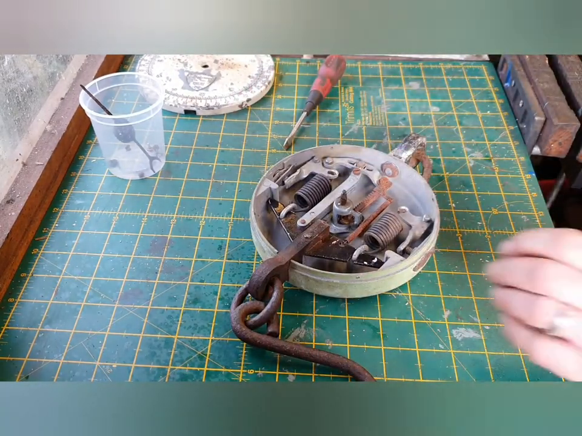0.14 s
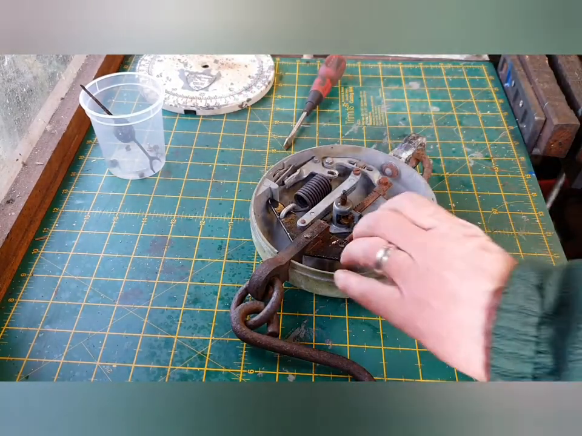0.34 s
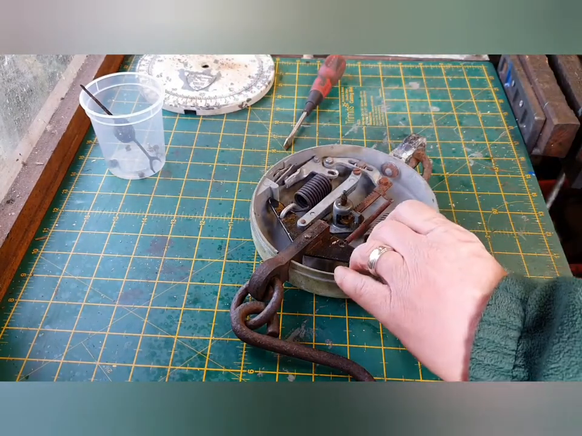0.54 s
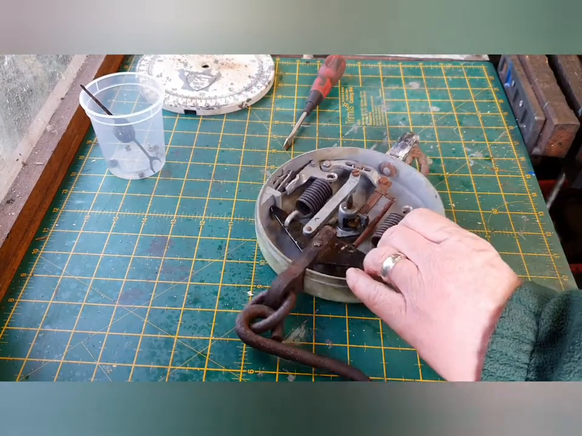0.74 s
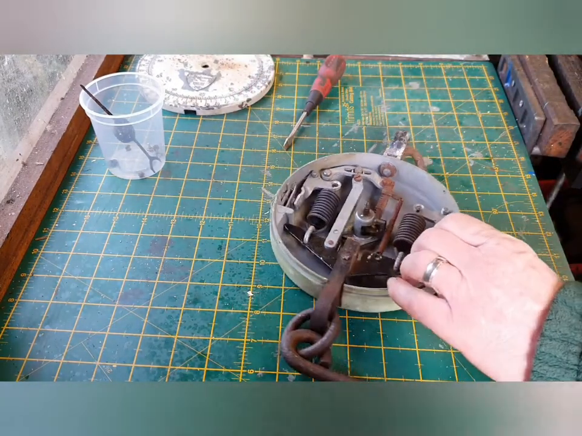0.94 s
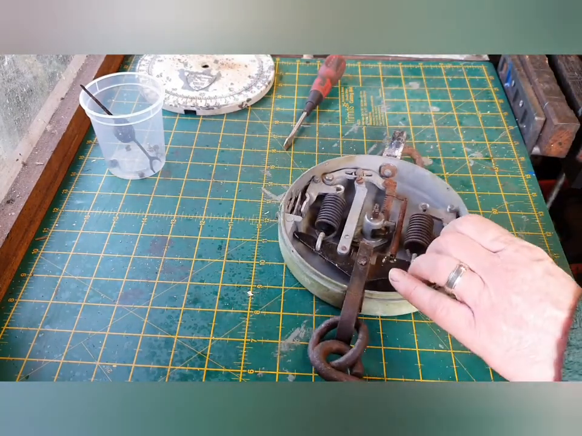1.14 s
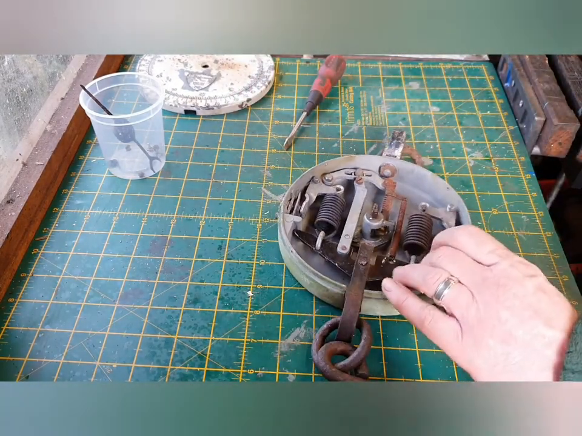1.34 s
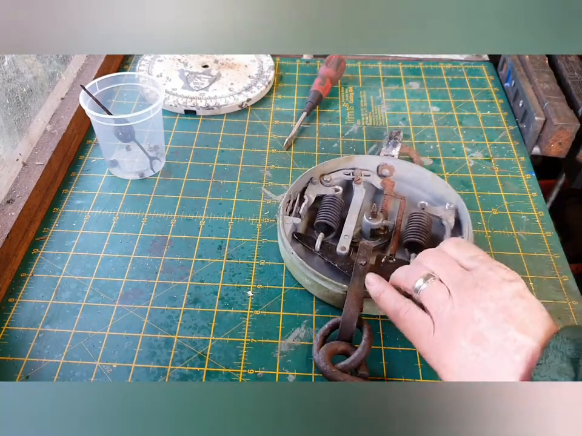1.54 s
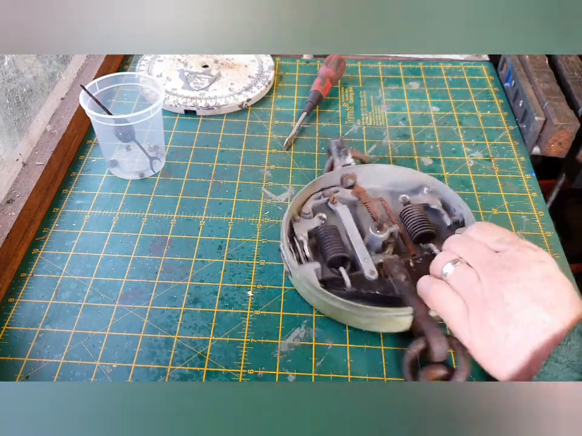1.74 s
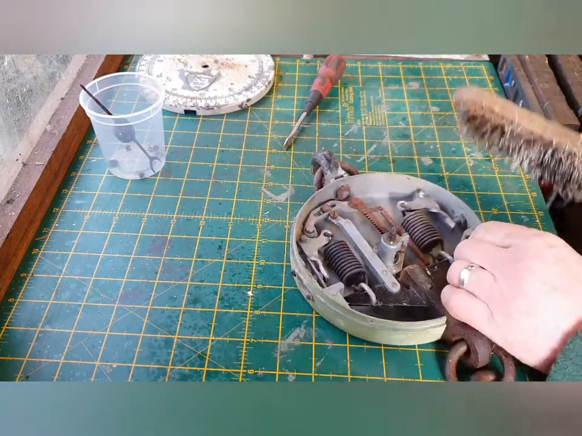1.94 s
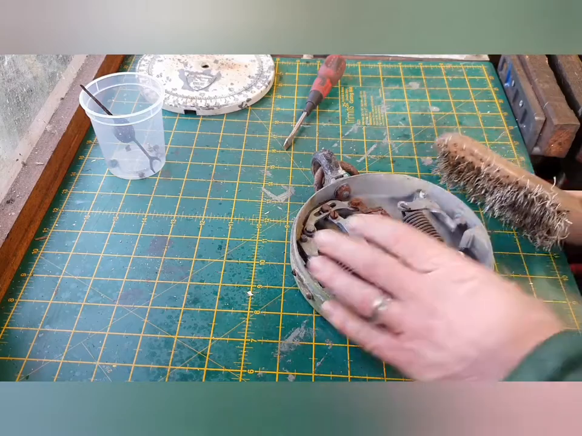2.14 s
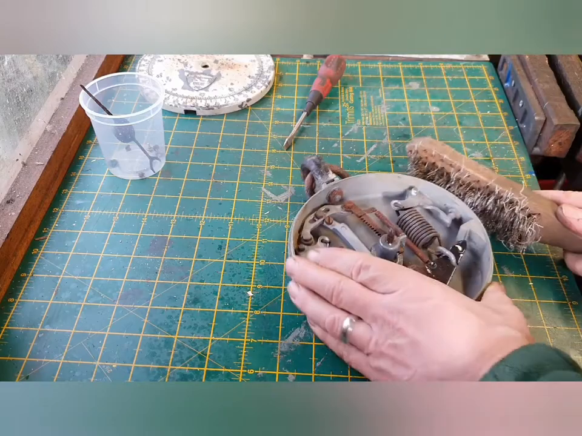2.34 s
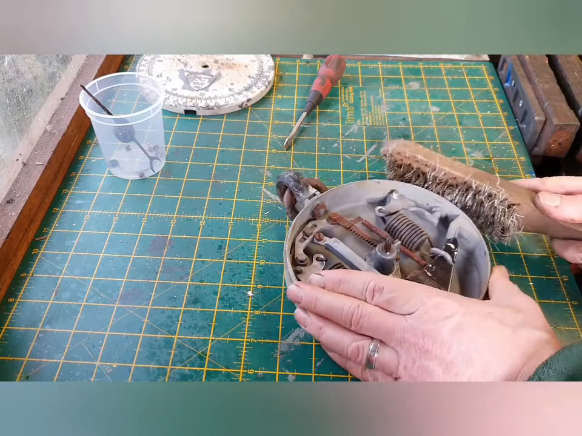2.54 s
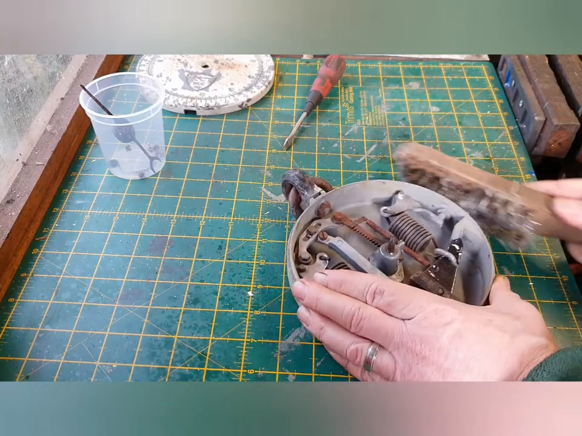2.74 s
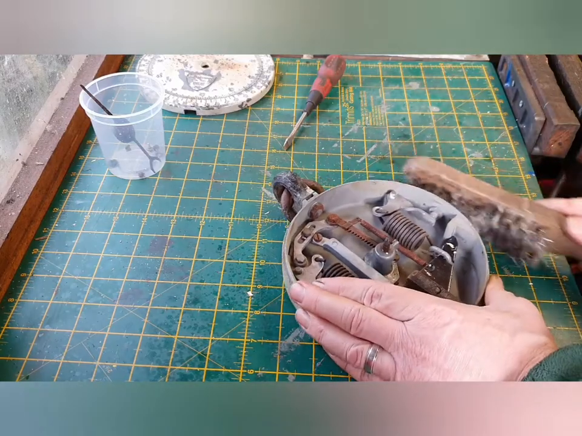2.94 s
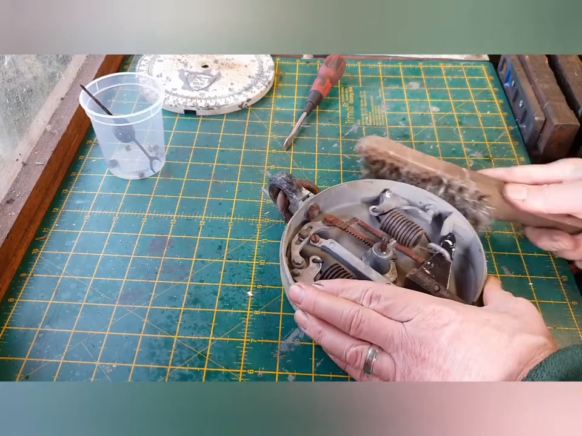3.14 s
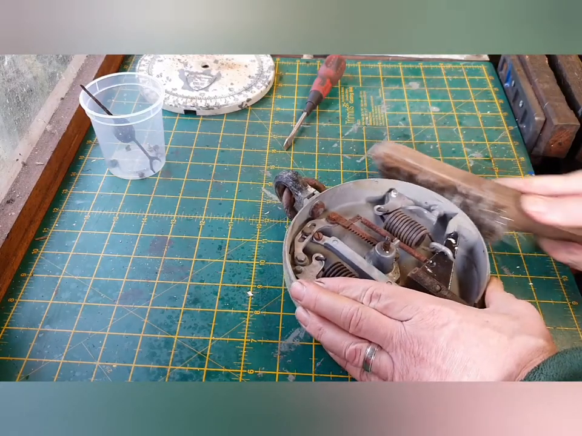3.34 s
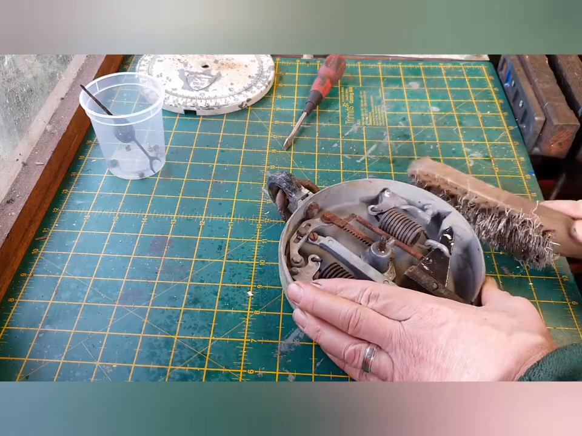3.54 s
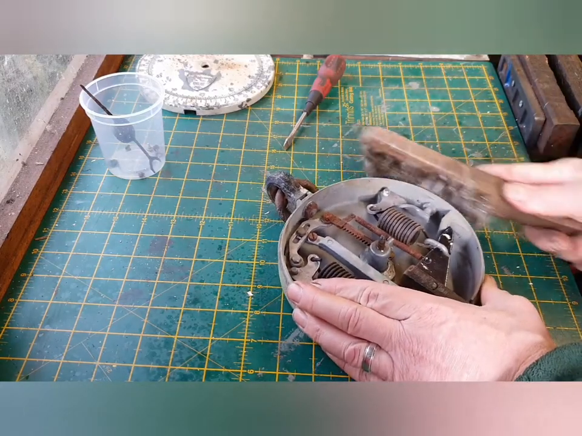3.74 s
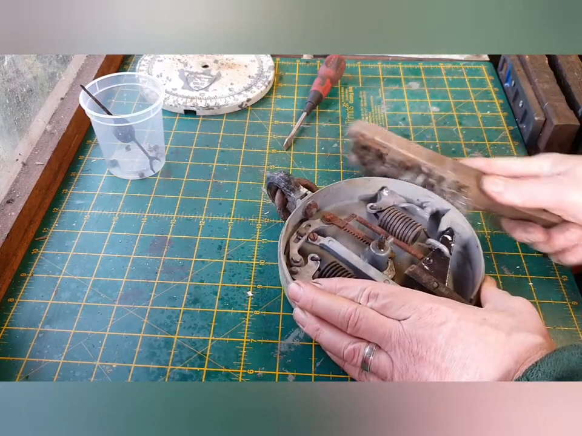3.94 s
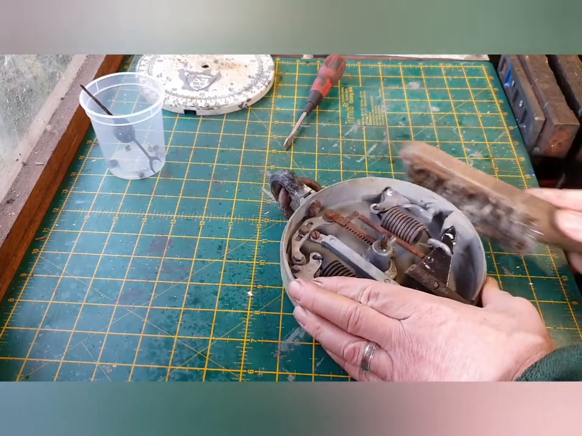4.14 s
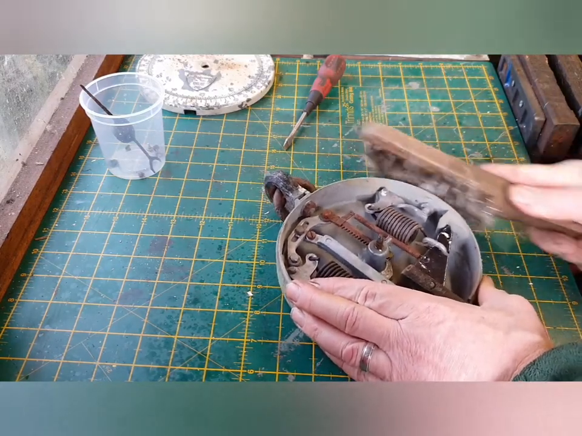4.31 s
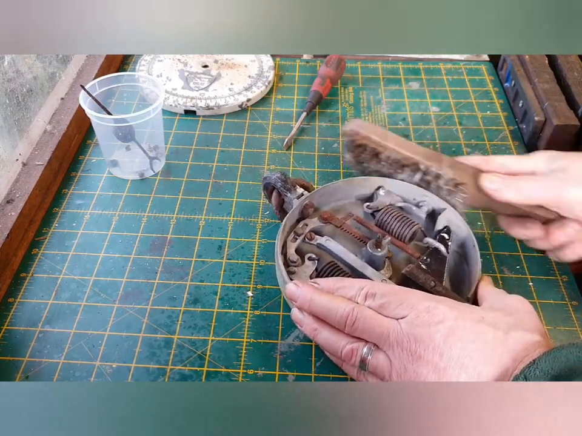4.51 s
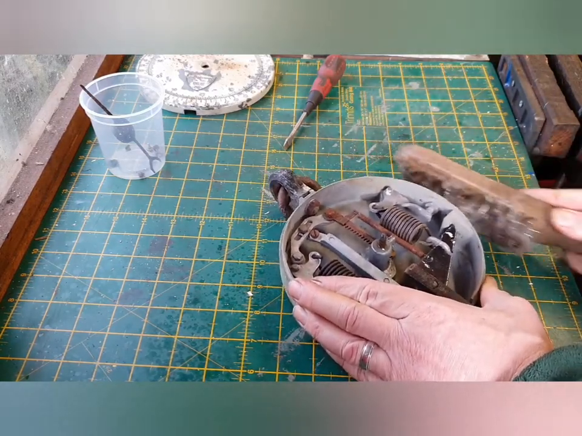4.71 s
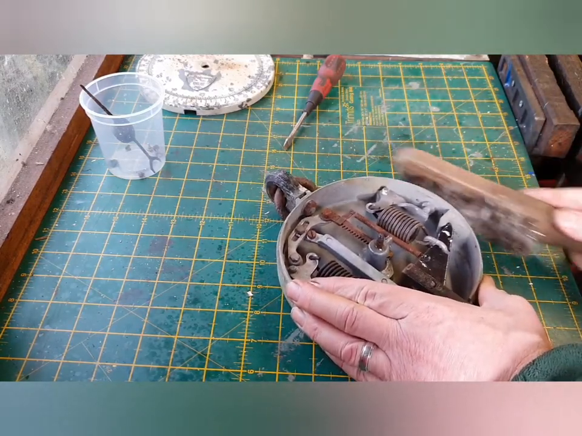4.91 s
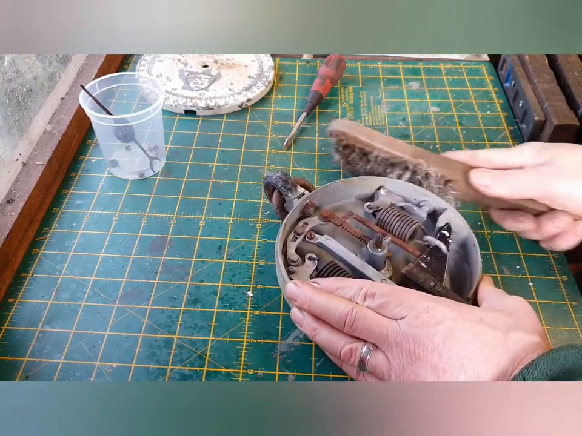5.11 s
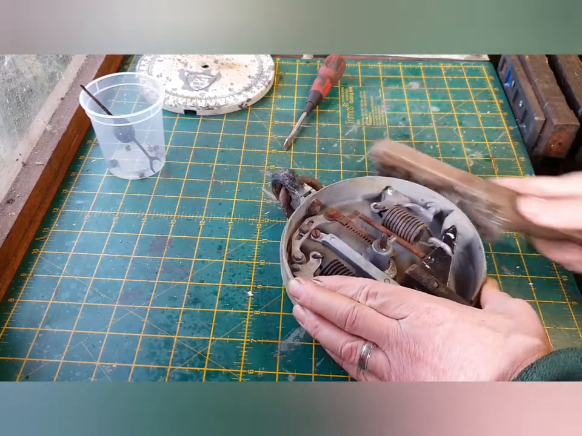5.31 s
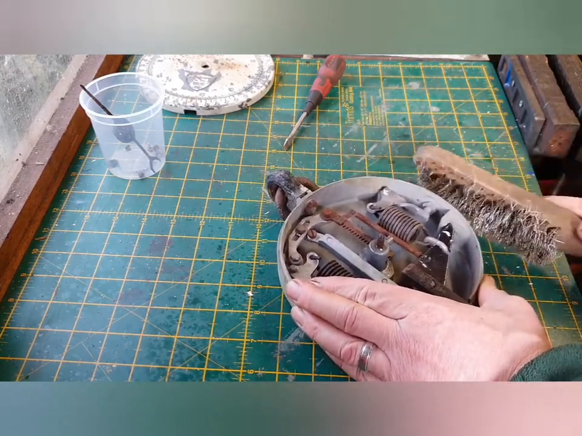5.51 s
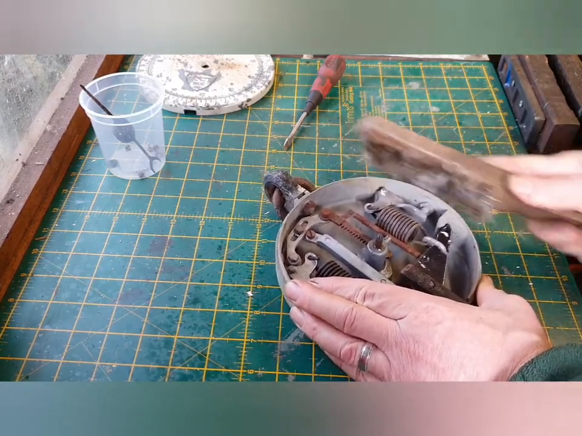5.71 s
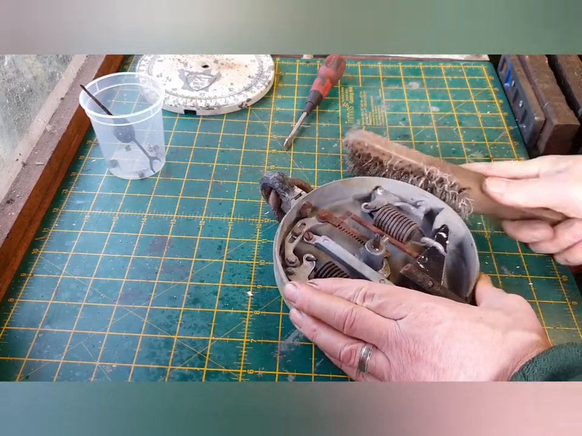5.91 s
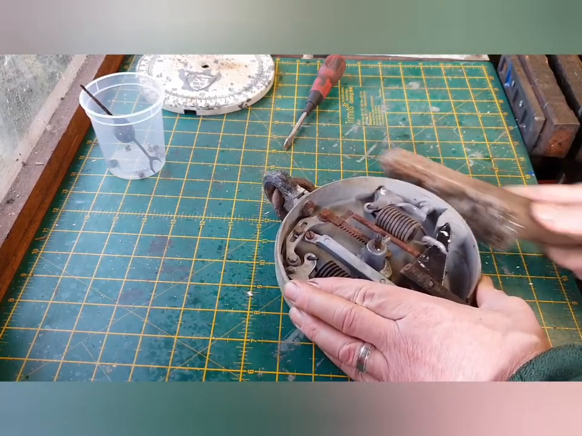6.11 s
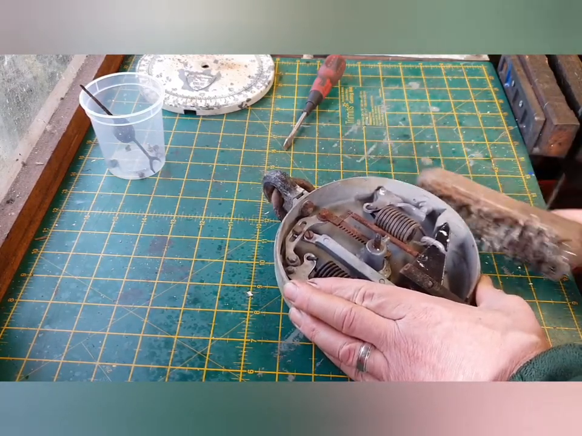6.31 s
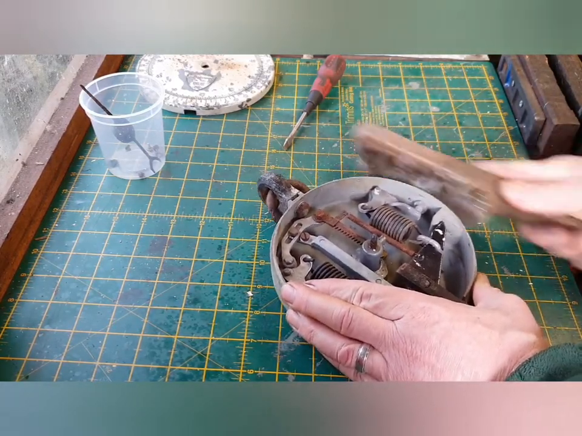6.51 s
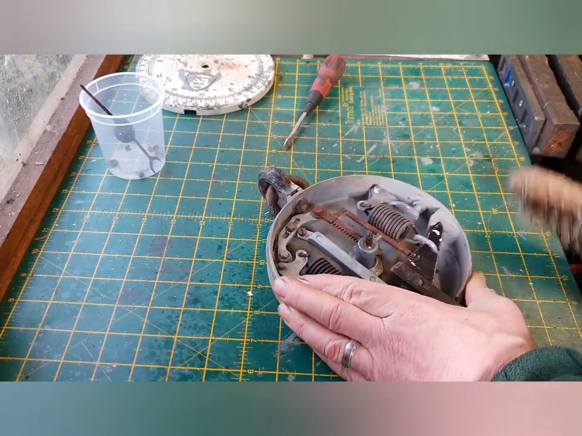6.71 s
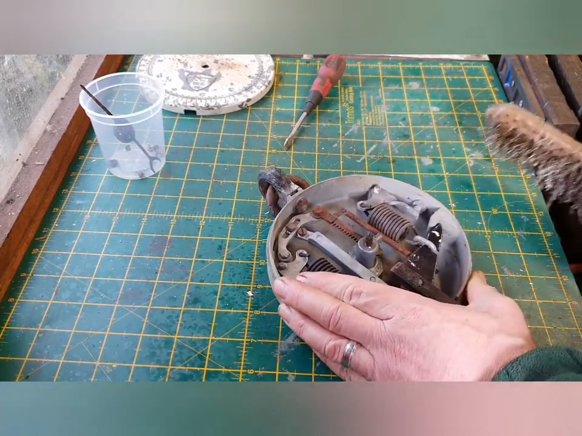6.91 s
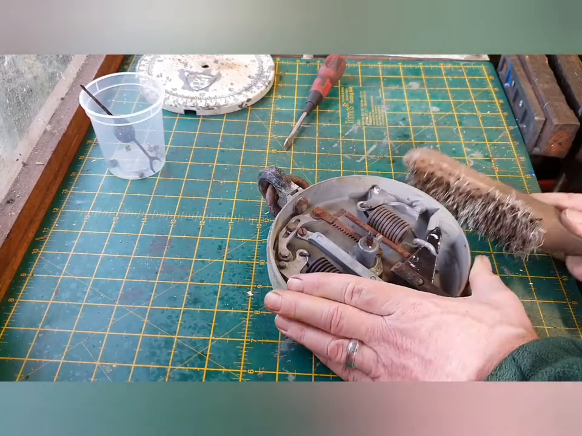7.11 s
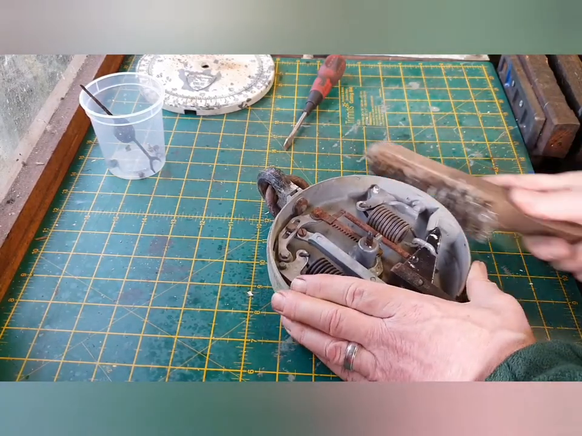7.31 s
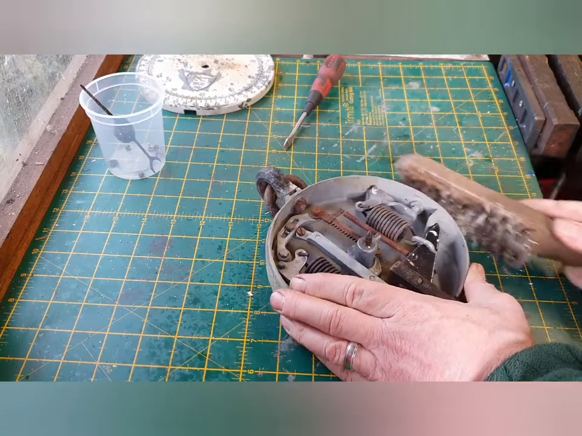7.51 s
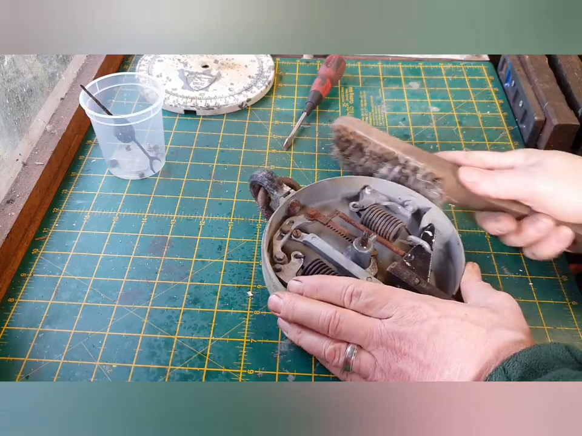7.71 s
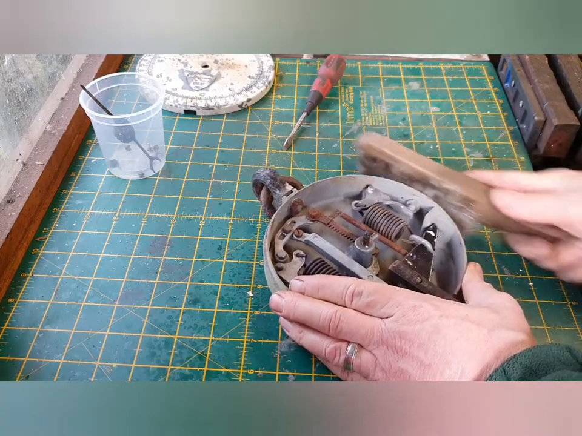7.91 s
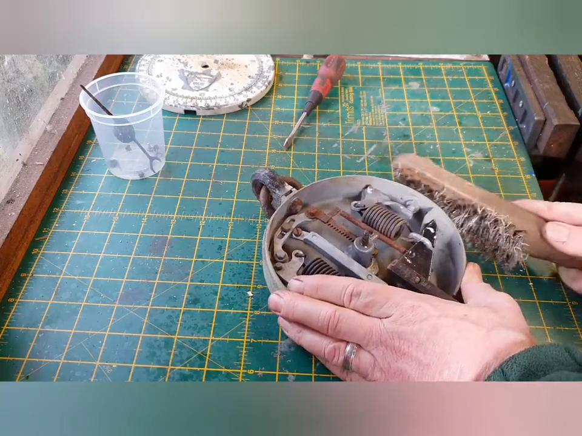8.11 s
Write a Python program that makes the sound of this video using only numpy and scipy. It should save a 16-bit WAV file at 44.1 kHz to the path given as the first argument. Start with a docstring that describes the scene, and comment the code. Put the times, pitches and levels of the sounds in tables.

```python
"""Wire brush on a rusty steel case

At a workbench in a quiet workshop, a close pair of microphones hears a round steel case turned on a rubber mat:
struck modes make its iron hook clank, and coloured clicks drag it over specks of rust.
Then a wire brush scrubs the rim, seven strokes a second, with one short pause: a dense rain of clicks hisses
and rings the steel's resonances, wires snag, the wooden back bumps in bursts of noise, and the bench drums.
Close walls add a short diffuse tail; room tone and a rustling sleeve lie behind."""
import sys
import numpy as np
from scipy import signal
from scipy.fft import rfft, irfft, next_fast_len
from scipy.io import wavfile
from scipy.ndimage import uniform_filter1d, map_coordinates

SR = 44100
rng = np.random.default_rng(int(sys.argv[2]) if len(sys.argv) > 2 else 0)


def wav_record(signal):
    """Record a signal, one row per channel, as 16-bit PCM in the file named by sys.argv[1]."""
    frames = np.transpose(np.atleast_2d(signal))
    bounded = np.clip(frames, -1, 1)
    # unit amplitude maps onto the largest positive 16-bit level
    quanta = np.round(bounded * 32767).astype(np.int16)
    wavfile.write(sys.argv[1], SR, quanta)


N = 359415
TIME, BINS = np.arange(N) / SR, np.fft.rfftfreq(N, 1 / SR)  # [s], [Hz]

# Levels in the tables are relative: each source trims them again.
# the quiet workshop: (frequency [Hz], level [dB])
ROOM_TONE = [(15, -41.5), (28, -20.5), (55, -2), (92, -4), (256, -21.5), (463, -27.5), (750, -34.5),
             (1130, -44), (4490, -52), (8590, -46.5), (16000, -64)]
# rustle of the sleeve: (frequency [Hz], level [dB])
SLEEVE = [(20, -15), (70, 7.5), (200, 1), (500, -11), (950, -10.5), (2000, -27), (3300, -30.5),
          (5000, -36.5), (9000, -32), (16000, -42)]
# how briskly the arm moves until it comes to rest on the case: (time [s], level [dB])
REACHING = [(0, -2), (.35, 2), (1.15, 2), (1.35, -9), (1.95, -4.5), (2.15, -13), (2.5, 0), (2.8, -47)]
# decay of the room: (frequency [Hz], time to fall 60 dB [s])
ROOM = [(100, 0.46), (500, 0.15), (1500, 0.14), (4000, 0.13), (9000, 0.077), (16000, 0.063)]
# correlation of the two microphones: (frequency [Hz], likeness [-1 to 1])
ALIKE = [(100, 1), (400, 0.88), (800, 0.41), (1400, 0.33), (1900, -0.16), (4000, 0.25), (5000, 0.16),
         (7000, 0.0093), (16000, -0.092)]
# balance of the pair: (frequency [Hz], left minus right [dB])
LEAN = [(300, 2.1), (700, -.4), (1200, .2), (2500, -1), (9000, -.9), (13000, .7)]
# the bench as a drum: (frequency [Hz], level [dB])
BENCH = [(15, -32), (30, -14), (45, -.8), (62, -2.5), (80, 1.3), (115, 0), (150, -10), (230, -20),
         (400, -32), (900, -60)]
# the case rocking onto the bench: (time [s], level [dB], pitch [Hz])
THUMPS = [(1.75, -25, 197), (1.974, -29.5, 192), (2.341, -26, 94), (2.378, -22, 84), (4.651, -16, 94),
          (4.944, -18.5, 94), (5.093, -16.5, 92), (5.538, -16, 86), (6.158, -19.5, 85), (6.338, -16.5, 89),
          (6.553, -16, 95.4), (7.512, -18, 76), (7.829, -17, 89), (8.128, -19, 86.1)]
# the hand shoves the case over the mat:
# (start [s], length [s], rubber drag [dB], grit [dB], bench shake [dB])
DRAG = [(0.224, 0.045, -51, -56, -51), (.365, 0.064, -48, -51, -47), (0.421, 0.053, -44, -53.5, -35.5),
        (0.49, 0.052, -36, -50, -46), (0.578, .13, -34.5, -43, -39), (0.747, 0.14, -38.5, -51, -37.5),
        (0.814, 0.15, -34.5, -51, -44), (.97, 0.25, -44, -54, -44.5), (1.223, 0.046, -41, -53, -36),
        (1.303, 0.31, -58.5, -60, -48), (1.562, 0.065, -46, -52, -40), (1.641, 0.24, -35, -39.5, -37),
        (1.957, 0.027, -42, -44, -35.5), (2.032, 0.046, -46, -54.5, -47), (2.084, 0.11, -63, -63, -59),
        (2.209, 0.057, -42, -41.5, -37.5), (2.267, 0.079, -39, -43, -31.5), (2.369, .14, -32.5, -41, -35),
        (2.53, 0.33, -44.5, -54.5, -39), (7.193, 0.11, -51.5, -58.5, -37)]
# rubber mat slipping under the case: (frequency [Hz], level [dB])
RUBBER = [(70, -22.5), (140, -23), (200, 3.5), (280, 0.5), (360, -10.5), (440, 1.5), (560, -18.5),
          (900, -15), (2000, -32)]
# specks of rust under the case: (frequency [Hz], level [dB])
GRIT = [(250, -7.5), (600, 5.5), (900, -29.5), (1350, 3.5), (2200, -2), (3300, -3), (4600, -8),
        (8500, -14.5), (16000, -20)]
# rust crushed under the rim in two shoves: (start [s], length [s], level at the end [dB])
GRINDING = [(1.64, .21, -34), (2.37, .06, -41)]
# sound of the crushed rust: (frequency [Hz], level [dB])
GRIND = [(400, -19), (750, -4.5), (1100, -3), (1550, -2.5), (2000, -12), (2400, -10), (2900, -24),
         (5000, -28)]
# hook, case and brush knocking on one another; the last two are brush wires snagging on the rim:
# (time [s], level [dB], treble tick [dB], frequency the struck spot favours [Hz])
KNOCKS_AND_SNAGS = [(.402, -36, -55, 2810), (0.511, -31, -37.8, 2830), (0.582, -36, -50, 2550),
                    (0.6307, -14, -38, 2480), (.639, -25.5, -35, 1490), (.702, -32.5, -37.5, 2840),
                    (0.8561, -15.5, -24, 3180), (.937, -36, -68, 2860), (1.239, -36.5, -49, 3400),
                    (1.257, -29, -33.5, 3760), (1.441, -55, -56.5, 3200), (1.566, -40.5, -54, 2780),
                    (1.644, -42, -45.5, 2640), (1.971, -53, -50, 2200), (2.01, -40.5, -43.5, 3760),
                    (2.254, -29, -35.5, 3380), (2.277, -36, -47, 1830), (2.352, -35, -44.5, 3100),
                    (2.368, -36, -51, 1830), (2.893, -32.5, -49, 2700), (3.058, -33.5, -38, 3070),
                    (6.548, -28.5, -30, 2864), (7.585, -37, -52, 2740), (7.784, -40, -33, 3400),
                    (8.066, -46, -33.5, 3400)]
# modes of hook and case: (frequency [Hz], level [dB], time to fall 60 dB [s])
IRON = [(250, -10, .2), (484, -5, .12), (1080, -4, .1), (1560, -5, .1), (1863, -7, .09), (2285, -3, .1),
        (2420, -5, .1), (2786, -2, .1), (3130, -1, .08), (3260, 1, .08), (3680, -5, .08), (4200, -13, .08),
        (5450, -12, .08), (6680, -17, .2), (8450, -9, .07)]
# the dull crack of a knock or snag: (frequency [Hz], level [dB])
CRACK = [(80, 2), (250, -1.5), (700, -1.5), (1500, -2.5), (3100, 0), (4200, -3.5), (5200, -9.5),
         (7000, -12.5), (8600, -7.5), (11000, -14.5), (16000, -17.5)]
# the wooden back of the brush bumping the rim, and near 7.2 s a dull bump as the hand shoves the case: (time
# [s], thud [dB], clack [dB])
BUMPS = [(2.701, -46, -45.5), (3.059, -36, -48), (3.503, -31, -57), (4.068, -31, -54), (4.792, -35.5, -58),
         (5.461, -34, -61), (5.881, -35, -52), (6.014, -37, -50), (6.151, -34.5, -33.5), (6.31, -35, -49.5),
         (6.546, -42, -44), (7.172, -42.5, -53.5), (7.208, -40, -65.5), (7.25, -50, -70.5),
         (7.511, -30, -33.5), (7.828, -36, -36.5)]
# low part of a bump: (frequency [Hz], level [dB])
THUD = [(100, -18), (220, 10.5), (330, 5.5), (440, 1), (600, -9), (1200, -65.5), (3000, -49.5)]
# high part of a bump: (frequency [Hz], level [dB])
CLACK = [(300, -36.5), (600, -3), (760, 8), (1020, 0), (1400, -1), (2200, -21), (5000, -65.5)]
# the wires barely touch as the grip shifts and the brush comes back: (time [s], level [dB])
GRAZES = [(7.028, -61), (7.059, -59.5), (7.18, -55.5), (7.229, -42), (7.276, -46)]
# the arm's effort, one list per bout; rows fall on turns of the brush, even strokes fill the time between:
# (time [s], level [dB], rasp [dB], bench shake [dB], brightness [dB])
STROKES = [
    [(2.586, -39, -4, -38, 6), (2.768, -32.5, -15, -35.5, -4), (2.888, -30.5, 5, -30.5, 1),
     (3.047, -29, -0.5, -34.5, -3), (3.903, -28, -3, -35.5, 1), (4.462, -27.5, -3.5, -33, 1),
     (5.303, -27.5, -1.5, -35.5, -1.5), (5.582, -26.5, -8.5, -32.5, 2.2), (5.86, -27, -3.5, -33.5, 1),
     (6.115, -30, 0.5, -37, 1.5), (6.53, -27, 0, -33.5, 0.3), (6.705, -32.5, 1.5, -40, 4)],
    [(7.288, -27, -5, -45, 1), (7.456, -30, 1, -33.5, -1.5), (7.76, -27.5, -0.5, -32, 0),
     (8.047, -26.5, 1, -32, 2.5), (8.17, -28, 5, -36, 3)],
]
# scratch of the wire tips: (frequency [Hz], level [dB])
SCRATCH = [(300, -22), (900, -15), (1700, -8), (2500, -3), (3700, 0), (4450, -5), (4950, -2.5), (6200, -2),
           (7000, -3.5), (8500, 0), (10500, -1), (13000, -1.6), (16000, -3)]
# resonances of the brushed steel: (frequency [Hz], width [Hz], level [dB])
STEEL = [(1340, 130, -6.5), (2048, 93, 1.5), (3091, 95, -3), (3190, 150, -8), (3850, 73, -5),
         (5730, 110, -4.5), (8400, 92, -7.5), (8600, 160, -7.5), (8920, 170, -3)]
# rasp of the tufts dragging over the rim: (frequency [Hz], level [dB])
RASP = [(100, -1), (160, -2.5), (250, 0.5), (340, -1), (440, 2), (530, -13.5), (750, -11.5), (1050, -13),
        (1450, -12), (2500, -14), (5000, -43.5)]


def amp(db):
    """Turns decibels into an amplitude factor."""
    return 10 ** (np.asarray(db) / 20)


def unit(x):
    """Scales a signal to an RMS of 1."""
    return x / np.sqrt(np.mean(x ** 2) + 1e-20)


def read(points, hz):
    """Reads a curve between its points, along a logarithmic frequency axis."""
    f, value = np.transpose(points)
    return np.interp(np.log(hz + 1), np.log(f + 1), value)


def add(mix, s, sound):
    """Lays a sound into the mix at s seconds, cut off at the end."""
    part = mix[:, max(round(s * SR), 0):][:, :sound.shape[-1]]
    part += sound[..., :part.shape[1]]


def colour(pair, spectrum):
    """Gives two unrelated signals a spectrum and the likeness of two close microphones."""
    size = next_fast_len(pair.shape[1], True)
    hz = np.fft.rfftfreq(size, 1 / SR)
    a, b = rfft(pair, size) * amp(read(spectrum, hz))
    same = np.clip(read(ALIKE, hz), -1, 1)
    mid, side = a * np.sqrt(1 + same), b * np.sqrt(1 - same)
    left_right = irfft(np.array([mid + side, mid - side]), size)
    return unit(left_right[:, :pair.shape[1]])


def noise(spectrum):
    """Steady coloured noise at both microphones."""
    return colour(rng.standard_normal((2, N)), spectrum)


def wobble(hz):
    """A random curve in straight lines between hz new values a second."""
    knots = rng.standard_normal(SR // 8)
    return unit(np.interp(TIME * hz, np.arange(len(knots)), knots))


def snaps(per_s, spread_db):
    """Tiny clicks of random sign; a positive spread makes a few large, a negative one a few small."""
    size = amp(spread_db * np.minimum(rng.exponential(1, (2, N)), 5))
    sign = rng.choice([-1, 1], (2, N))
    struck = rng.random((2, N)) < per_s / SR
    return unit(size * sign * struck)


def resonate(x, hz, width):
    """A resonance of gain 1 that follows the curve hz: shift to zero, smooth, shift back."""
    turn = np.exp(2j * np.pi * np.cumsum(hz) / SR)
    r = np.exp(-np.pi * width / SR)
    smooth = signal.lfilter([1 - r], [1, -r], x * turn.conj() + 1e-18)
    return 2 * (turn * smooth).real


def patchy(x, depth_db, width_hz, length_s):
    """Lets patches of the spectrum swell and fade on their own."""
    hz, t, z = signal.stft(x, SR, nperseg=512, noverlap=384)
    cells = rng.standard_normal((400, 600))
    places = np.meshgrid(hz / width_hz, t / length_s, indexing="ij")
    field = map_coordinates(cells, places, order=1, mode="mirror")
    gain = unit(amp(depth_db * unit(field)))
    return signal.istft(z * gain, SR, nperseg=512, noverlap=384)[1][:, :N]


def shove(start, length, rise_s, release_s):
    """Speed of a sliding contact: it gets going, holds, and dies away."""
    t = np.maximum(TIME - start, 0)
    return (1 - np.exp(-t / rise_s)) * np.exp(-np.clip((t - length) / release_s, 0, 20))


def background(tone_db=-51, sleeve_db=-45.5):
    """Room tone, and the soft rustle of the sleeve until the arm comes to rest."""
    folds_db = 2 * wobble(hz=9)
    moving = amp(np.interp(TIME, *np.transpose(REACHING)) + folds_db)
    return amp(tone_db) * noise(ROOM_TONE) + amp(sleeve_db) * moving * noise(SLEEVE)


def room(x, gap_s=0.0026):
    """Close walls: a short diffuse tail after a gap, its treble dying first."""
    burst = colour(rng.standard_normal((2, SR // 2)), [(20, 0), (20000, 0)])
    hz, t, z = signal.stft(burst, SR, nperseg=256)
    tail = signal.istft(z * amp(-60 * t / read(ROOM, hz)[:, None]), SR, nperseg=256)[1]
    tail = tail * (np.arange(tail.shape[1]) / SR > gap_s)
    tail = tail / np.linalg.norm(tail, axis=1, keepdims=True)
    return signal.fftconvolve(x, tail, axes=1)[:, :N]


def thumps(level_db=-1, t60=0.16, rise_s=0.0017):
    """The case rocks onto the bench, which booms: one dying sine a thump."""
    out, t = np.zeros((2, N)), np.arange(SR // 3) / SR
    for s, db, hz in THUMPS:
        fade = amp(db + level_db - 60 * t / t60) * (1 - np.exp(-t / rise_s))
        add(out, s, fade * np.sin(2 * np.pi * hz * t))
    return out


def drag(rubber_db=-2, grit_db=0, bench_db=-0.5):
    """The case judders over the rubber mat, grinding specks of rust; the bench shakes on a little longer."""
    rub, grit, shake = np.zeros((3, N))
    for s, length, rub_db, speck_db, shake_db in DRAG:
        speed = shove(s, length, rise_s=.014, release_s=0.024)
        rub += amp(rub_db) * speed
        grit += amp(speck_db) * speed
        shake += amp(shake_db) * shove(s, length, rise_s=0.031, release_s=.045)
    slips = amp(rubber_db) * rub * colour(snaps(per_s=760, spread_db=3.5), RUBBER)
    specks = amp(grit_db) * grit * colour(snaps(per_s=6000, spread_db=2.5), GRIT)
    return slips + specks + amp(bench_db) * shake * noise(BENCH)


def grinding(level_db=-2, swell_db_per_s=55):
    """Rust under the rim is crushed in coarse grains, louder as the hand bears down."""
    weight = np.zeros(N)
    for s, length, db in GRINDING:
        swell_db = swell_db_per_s * np.minimum(TIME - s - length, 0)
        weight += amp(db + swell_db) * shove(s, length, rise_s=.008, release_s=0.02)
    grains = snaps(per_s=1500, spread_db=1.5)
    return amp(level_db) * weight * colour(grains, GRIND)


def hook_slide(start_s=1.4, length_s=.2, hz=3200, width_hz=110, db=-62):
    """The hook slides in its eye and the iron sings faintly: clicks through one resonance."""
    singing = unit(resonate(snaps(per_s=900, spread_db=8), np.full(N, hz), width_hz))
    return amp(db) * shove(start_s, length_s, rise_s=.04, release_s=.03) * singing


def knocks_and_snags(modes_db=-6, crack_t60=0.14, snap_db=6, snap_s=0.0045, rise_s=0.00059, spot_db=5.5,
                     favour=2.5, favour_width=380, small_hz=2800, thinning=11, rebound_db=-11):
    """Hard knocks and snags on steel: a crack with one rebound, and modes; higher spots have less body."""
    out, t = np.zeros((2, N)), np.arange(SR // 3) / SR
    edges_hz = [(120, 2000), (2000, 5000), (5000, 17000)]  # body, ring, tick
    bands = [signal.butter(3, edges, "band", fs=SR, output="sos") for edges in edges_hz]
    for s, ring_db, tick_db, spot_hz in KNOCKS_AND_SNAGS:
        body_db = ring_db - 10 * np.log10(1 + (spot_hz / small_hz) ** thinning)
        since = t - 0.019 * rng.uniform(0.63, 0.98)  # the rebound comes 12 to 19 ms later
        rebound = amp(rebound_db) * (since > 0) * np.exp(-abs(since) / snap_s)
        contacts = np.exp(-t / snap_s) + rebound
        crack = colour(rng.standard_normal((2, len(t))), CRACK)
        crack = crack * (amp(-60 * t / crack_t60) + amp(snap_db) * contacts)
        ring = np.zeros((2, len(t)))
        for hz, db, t60 in IRON:
            phase = rng.normal(0, min(hz / 1500, 3), (2, 1))  # high modes reach the pair out of step
            # each struck spot weights the modes by chance
            ring += amp(db + spot_db * rng.normal() - 60 * t / t60) * np.sin(2 * np.pi * hz * t + phase)
        blow = (unit(crack) + amp(modes_db) * unit(ring)) * (1 - np.exp(-t / rise_s))
        blow = blow + favour * resonate(blow, np.full(len(t), spot_hz), favour_width)
        for band, db in zip(bands, [body_db, ring_db, tick_db]):
            part = signal.sosfilt(band, blow)
            add(out, s, amp(db) * part / np.std(part[:, :SR // 40]))  # level of the first 25 ms
    return out


def bumps(thud_db=-2, clack_db=-2, t60=0.092, rise_s=0.00094):
    """Wood on the hand-damped case: a thud and a clack of noise that die at once."""
    out, t = np.zeros((2, N)), np.arange(SR // 5) / SR
    fade = amp(-60 * t / t60) * (1 - np.exp(-t / rise_s))
    for s, low_db, high_db in BUMPS:
        for spectrum, db in [(THUD, low_db + thud_db), (CLACK, high_db + clack_db)]:
            part = fade * colour(rng.standard_normal((2, len(t))), spectrum)
            add(out, s, amp(db) * part / np.std(part[:, :SR // 40]))  # level of the first 25 ms
    return out


def graze(rise_s=0.0018, fade_s=0.032):
    """The wires rustle faintly in the pause: sparse clicks in brief touches."""
    touch = sum(amp(db) * shove(s, 0, rise_s, fade_s) for s, db in GRAZES)
    return touch * colour(snaps(per_s=2600, spread_db=2.0), SCRATCH)


def arm(stroke_s=.14, sharpness=1.076, rest=0.21, lean=0.17, pull_db=0.62,
        flip_at=0.084, flip_width=0.039, flip=0.3):
    """Force, rasp, bench shake, brightness [dB] and reach (-1 to 1) of a brush that eases at each turn."""
    controls = np.zeros((5, N))
    for bout in STROKES:
        marks, *effort = np.transpose(bout)
        strokes_between = np.maximum(np.round(np.diff(marks) / stroke_s), 1)
        count = np.cumsum(np.r_[0, strokes_between])
        inside = (TIME >= marks[0]) & (TIME < marks[-1])
        stroke, u = np.divmod(np.interp(TIME[inside], marks, count), 1)  # u: 0 to 1 along a stroke
        db, rasp_db, bench_db, bright_db = (np.interp(stroke + .5, count, column) for column in effort)
        way = (-1) ** stroke  # 1 on a push, -1 on a pull
        speed = np.sin(np.pi * u)
        grip = rest + np.tanh(1.9 * speed ** (2 * sharpness))
        # a push bears down early; a pull is a little louder and bears down late
        bearing = np.exp(-2 * lean * way * (u - .5)) * amp(-pull_db * way)
        force = unit(grip * bearing)
        flop = flip * np.exp(-((u - flip_at) / flip_width) ** 2)  # bent wires flip just after the turn
        controls[:, inside] = [amp(db) * force, amp(db + rasp_db) * (force + flop),
                               amp(bench_db) * (0.5 + .75 * speed), bright_db, way * np.cos(np.pi * u)]
    return uniform_filter1d(controls, 300, axis=1)


def brush(scratch_db=-2.0, steel_db=-10, rasp_db=-11, bench_db=-2.0, flutter_db=1.05,
          bend=0.011, sweep=0.022, wander_db=3):
    """Wire tips catch and let go in tufts; they hiss, ring the steel and shake the bench."""
    force, rasp, shake, bright_db, reach = arm()
    flutter = amp(flutter_db * wobble(hz=212.6))
    tips = colour(snaps(per_s=30000, spread_db=-1.8), SCRATCH) * force * flutter
    # each resonance bends, swells and fades as the contact travels over the steel
    steel = np.zeros((2, N))
    for hz, width, db in STEEL:
        bent_hz = hz * (1 + bend * reach + 0.007 * wobble(hz=11))
        swell = amp(db + wander_db * wobble(hz=8.4))
        steel += swell * unit(resonate(tips, bent_hz, width))
    sound = amp(scratch_db) * tips + amp(steel_db) * np.std(tips) * unit(steel)
    # brightness tilts the sound about 5500 Hz
    treble = irfft(rfft(sound) / (1 + (5500 / (BINS + 1)) ** 4), N)
    sound = (sound - treble) * amp(-bright_db / 2) + treble * amp(bright_db / 2)
    # the bounce off the bench top comes later or sooner as the brush moves
    bounce_s = 0.00116 + 0.000057 * reach
    bounce = np.array([np.interp(TIME - bounce_s, TIME, side) for side in sound])
    sound = patchy(sound + sweep * bounce, depth_db=2.5, width_hz=327, length_s=.035)
    rim = amp(rasp_db) * rasp * patchy(noise(RASP), depth_db=4.0, width_hz=160.4, length_s=.03)
    return sound + rim + amp(bench_db) * shake * noise(BENCH)


def scene():
    """All sources near the pair; the walls answer the scrubbing more than the handling."""
    handling = drag() + grinding() + hook_slide() + knocks_and_snags() + bumps()
    scrub = graze() + brush()
    walls = room(amp(-7) * scrub + amp(-15.5) * handling)
    return background() + walls + thumps() + handling + scrub


def record(dry, edge_hz=15980):
    """The left microphone takes more bass; then a low-pass sets the band limit."""
    lean_db = read(LEAN, BINS)
    heard = irfft(rfft(dry) * amp(np.array([lean_db, -lean_db]) / 2), N)
    low_pass = signal.firwin(511, edge_hz, window=("kaiser", 9), fs=SR)
    return signal.oaconvolve(heard, low_pass[None], "same")


dry = scene()
out = record(dry)
wav_record(out)
```